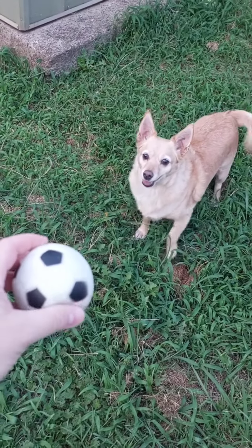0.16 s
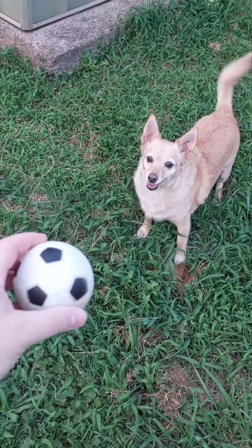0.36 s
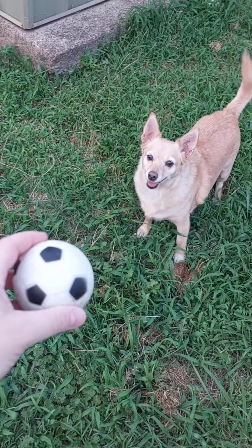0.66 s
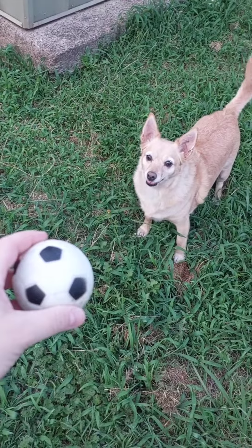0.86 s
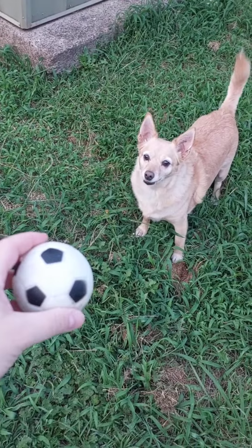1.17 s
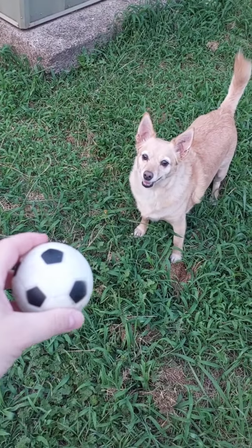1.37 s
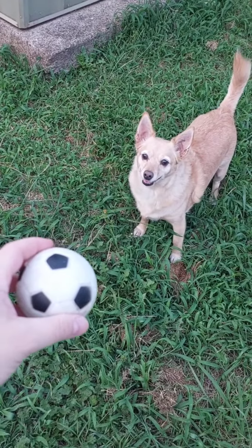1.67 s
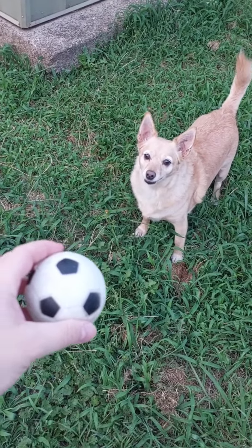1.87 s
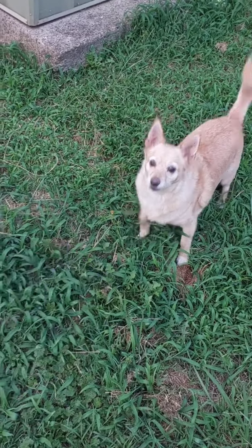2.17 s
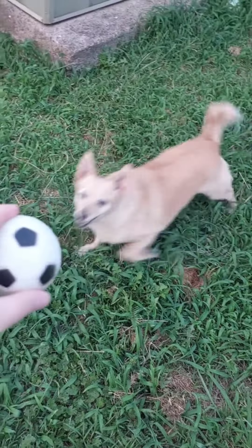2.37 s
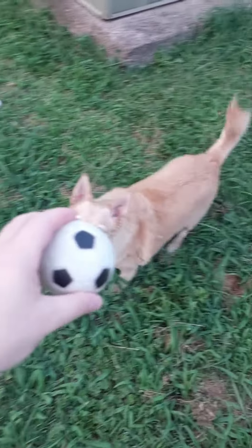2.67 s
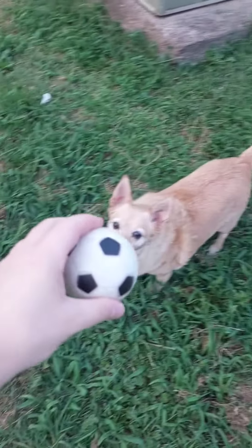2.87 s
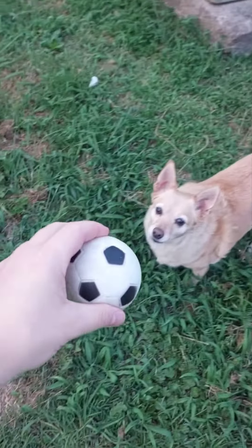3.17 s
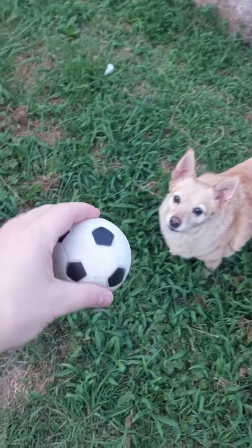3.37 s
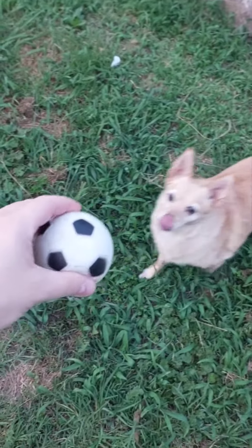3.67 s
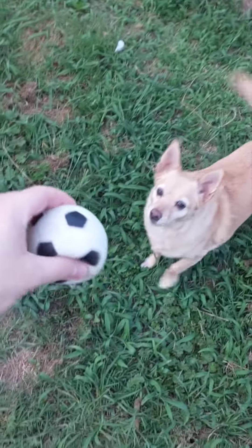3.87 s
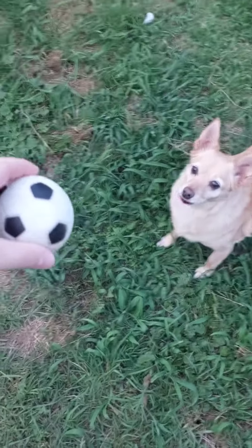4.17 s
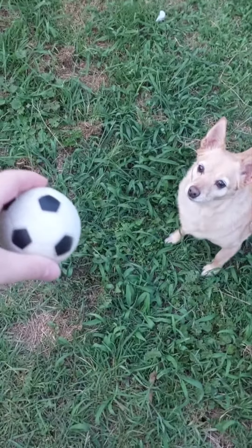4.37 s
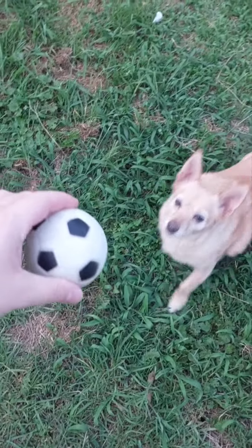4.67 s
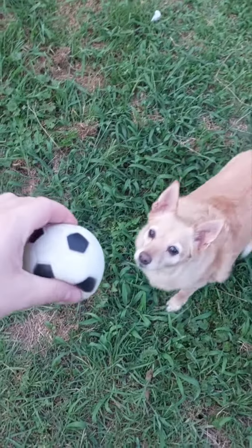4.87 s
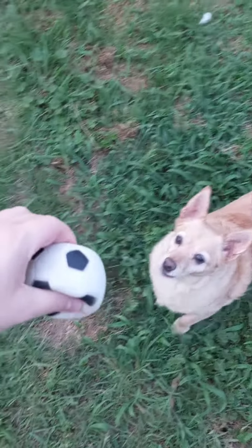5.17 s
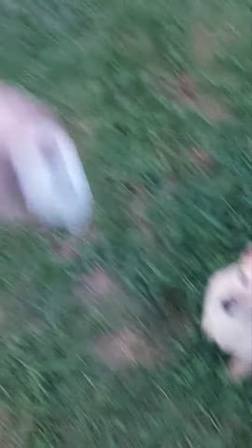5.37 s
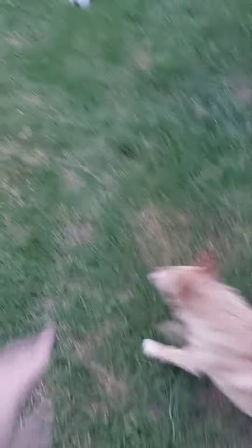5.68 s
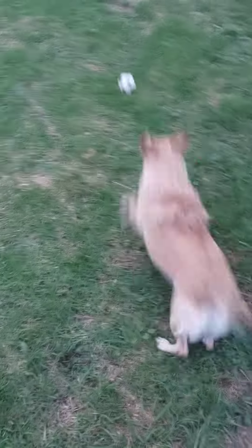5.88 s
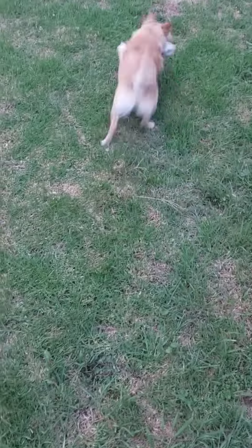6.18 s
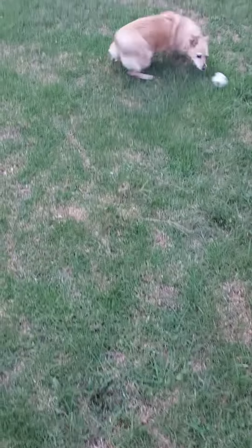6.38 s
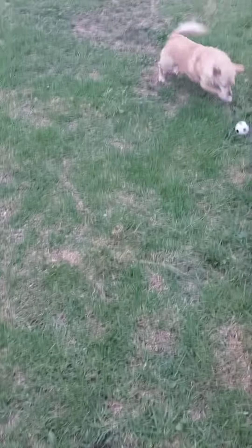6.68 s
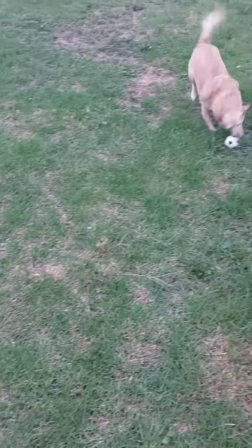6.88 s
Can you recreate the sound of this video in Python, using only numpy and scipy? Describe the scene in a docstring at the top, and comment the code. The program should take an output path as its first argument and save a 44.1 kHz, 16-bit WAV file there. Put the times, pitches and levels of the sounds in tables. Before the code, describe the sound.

High squeaks and wheezy refills from a hand-squeezed toy ball outdoors, with faint hiss and light paw rustles on a lawn.

```python
"""A shrill squeak from a rubber ball squeezed close by on a lawn; later two light and two hard squeezes.
Air forced out drives a plastic reed up and down in pitch; after each hard squeeze the ball refills
through the reed with a falling wheeze. Around it: a faint warbling hiss, far whistles, a low rumble,
and steps and a small dog's paws rustling in the grass."""
import sys
import numpy as np
from scipy import signal
from scipy.fft import rfft, irfft
from scipy.io import wavfile
from scipy.ndimage import uniform_filter1d, minimum_filter1d

SR = 44100
rng = np.random.default_rng(int(sys.argv[2]) if len(sys.argv) > 2 else 0)


def generate_wav(signal):
    """Clip the signal to [-1, 1] and save it as 16-bit WAV at the path in sys.argv[1]."""
    frames = np.transpose(np.atleast_2d(signal))
    scaled = np.clip(frames, -1, 1) * 32767
    pcm = np.round(scaled).astype(np.int16)
    wavfile.write(sys.argv[1], SR, pcm)


N = 310023
TIME_S = np.arange(N) / SR
STALL_HZ, BAND_LIMIT_HZ = 899.4, 15850

# Table levels are relative; each layer applies its own gain.
# background spectra: f/Hz, level/dB
RUMBLE_SPECTRUM = [(13, -44), (22, -13), (43, -2), (65, -2), (167, -13), (274, -13.5), (426, -22),
                   (501, -20.5), (610, -26.5), (1100, -26.5), (1430, -39), (2420, -120)]
HISS_SPECTRUM = [(350, -37.5), (600, -14.5), (1140, -16.5), (1370, -7), (1620, -10), (2800, -0.5),
                 (3300, -6), (3930, -1), (9340, -18), (12000, -19), (15600, -44.5), (22000, -120)]
WARBLE_SPECTRUM = [(1500, -28), (2300, -3), (2800, 2), (3400, -6.5), (4100, -2.5), (5100, 3), (6000, -11),
                   (7500, -15), (10000, -35.5)]
GRASS_SPECTRUM = [(400, -19), (1500, 3), (3000, -10), (7000, 0), (10000, -3), (13000, 5.5), (16000, -2.5)]
# background envelopes: t/s, level/dB
HISS_ENVELOPE = [(.42, -66.5), (.85, -63), (1.15, -64), (1.28, -70), (1.42, -61), (1.8, -55), (2.0, -65.5),
                 (2.2, -57), (3.1, -56), (3.28, -67), (3.5, -60), (4.42, -67), (4.65, -62), (4.9, -60.5),
                 (5.6, -56.5), (6.15, -67), (6.4, -60), (7.0, -61.5)]
WARBLE_ENVELOPE = [(.42, -56.5), (.68, -51), (1.14, -56), (1.27, -61.5), (1.5, -46), (1.75, -57),
                   (2.15, -60.5), (2.38, -44.5), (2.68, -50), (2.95, -50), (3.25, -55), (3.42, -81),
                   (4.36, -53), (4.75, -65), (5.8, -55.5), (6.3, -61.5), (6.62, -57), (7.0, -51.5)]
# step and handling knocks: t/s, peak/dB, f/Hz, time constant/s
KNOCKS = [(1.624, -48, 59, 0.036), (2.352, -36, 65, 0.013), (2.397, -46.5, 567, 0.0066),
          (3.478, -50, 50.7, 0.041), (3.842, -51, 60, 0.046), (5.434, -40, 72.8, 0.02),
          (5.708, -38.5, 1230, 0.00122), (6.095, -43, 2790, 0.0019)]
# far whistles: t/s, length/s, start f/Hz, end f/Hz, level/dB
WHISTLES = [(.76, 0.33, 974, 1120, -75.5), (1.24, 0.28, 1250, 1423, -65.5), (2.181, .16, 1450, 1580, -65.5),
            (3.746, .1, 4920, 4730, -52), (6.571, 0.14, 4010, 3860, -55), (6.803, 0.19, 3940, 4230, -64)]
# feet and paws brushing grass: t/s, peak/dB, rise/s, fall/s
STEPS = [(.87, -67, .012, 0.028), (1.55, -65.5, 0.1, 0.079), (2.47, -57.5, 0.19, .27),
         (3.501, -67, 0.021, 0.12), (4.8, -66.5, 0.026, .09), (5.77, -56, 0.1, 0.065),
         (5.89, -57.5, 0.042, .06), (6.02, -57.5, 0.017, 0.05), (6.11, -58.5, .012, 0.033),
         (6.25, -63.5, 0.047, 0.026), (6.36, -58.5, 0.032, 0.045), (6.55, -62, 0.063, 0.42)]
# blades snapping: t/s, level/dB, decay/s
SNAPS = [(2.421, -34.5, 0.031), (2.548, -32, 0.017), (2.727, -39, 0.0098), (5.879, -34, 0.011),
         (5.954, -38, 0.015), (6.093, -37.5, 0.014), (6.112, -34.5, 0.0065), (6.252, -48.5, 0.0095),
         (6.349, -36.5, 0.0067)]
# hand, body and ground echoes: left delay/s, right delay/s, level/dB
NEAR_ECHOES = [(.00062, 0.0011, -21.5), (.0019, 0.0033, -30), (.0034, .0039, -18), (.0061, 0.0083, -16),
               (.0083, 0.014, -17)]
# ball position: t/s, right minus left/dB
BALL_PAN = [(0, -3.5), (3.7, -1.5), (4.2, 2.5), (4.9, 6.5), (5.7, -5.5)]
# mouthpiece response, air out and air in: f/Hz, left/dB, right/dB
MOUTHPIECE_OUT = [(900, -4, -6.5), (2140, -10, 3), (2500.0, -3, -22.5), (3250, -0.5, 4), (4480, 2, 2.5),
                  (5360, 4, 5), (6340, 0.5, 4), (6830, -5.5, 13.5), (7640, 13.5, 20.5), (8420, -2.5, 14),
                  (9670, -9, 1), (11300, -7, 3), (12300, -10, 2), (14500.0, -21, 3.5)]
MOUTHPIECE_IN = [(1040, -4, -4.0), (2162, -9.5, 8.5), (2210, 12.5, -3.5), (3330, 1.5, 11), (3900, 4.5, 5.5),
                 (4870, 9, 7), (6260, -11.5, 1.5), (6930, -4.5, -2.5), (7630, 5, 28.5), (7280, 24.5, 26),
                 (8670, -1.5, 17.5), (9600.0, 8, 17.5), (11700, 0, 19), (12850, 12.5, 15.5),
                 (14300, -21, 13)]
# reed registers: f/Hz, level/dB, brightness/(dB/oct), roughness/1
REGISTERS = [(880, -43, -3, 0.3), (1054, -30, 6, .48), (1280, -21.5, 0.5, .5), (1790, -26, 4.5, 1),
             (2010, -18, -3, 1), (2600, -17.5, -6.5, 0.7), (3050, -24.5, 1, 0.4), (4000, -29.5, -5.5, 0.6)]
# reed pitch following hand pressure, one curve per hard squeeze: t/s, f/Hz
SQUEEZE_PITCH = [
    [(0, 2003), (.006, 1969), (.009, 2587), (.019, 2797), (.032, 3760), (.042, 3780), (.054, 3643),
     (.062, 2804), (.071, 2388), (.076, 1870), (.087, 1207), (.104, 903)],
    [(3.825, 988), (3.842, 1109), (3.856, 1323), (3.878, 1730), (3.888, 2114), (3.892, 2544), (3.905, 2876),
     (3.916, 3575), (3.926, 3684), (3.937, 2690), (3.944, 2444), (3.949, 1783), (3.962, 1108), (3.973, 874)],
    [(5.169, 968), (5.19, 1125), (5.205, 1220), (5.222, 1447), (5.254, 1904), (5.268, 1923), (5.285, 1877),
     (5.294, 1693), (5.312, 1303), (5.33, 1078), (5.348, 920)],
]
# hard squeezes: strength/dB, easing/(dB/s), added brightness/(dB/oct), added roughness/1
HARD_SQUEEZES = [(3, 43, -2, .05), (1, 26, 0.5, -.05), (-1.33, 6, -1.7, 0.087)]
# light squeezes: start/s, top/s, end/s, top f/Hz, level/dB, brightness/(dB/oct)
LIGHT_SQUEEZES = [(3.558, 3.584, 3.638, 1029, -28, 4), (4.968, 4.999, 5.046, 1070, -31.5, 5)]
# refills: start/s, top/s, end/s, top f/Hz, bend/1, level/dB, fade/dB, top and stall brightness/(dB/oct)
REFILLS = [(.145, 0.157, .32, 1064, 1.05, -30.5, 10.5, 4, 8.8),
           (3.993, 4.009, 4.161, 1091, 1.3, -30, 8.5, 3.5, 3),
           (5.377, 5.418, 5.708, 1113, 1.61, -29.5, 20.1, 9.5, 9.4)]


def amp(db):
    """Decibels to gain."""
    return 10 ** (np.asarray(db) / 20)


def unit(x):
    """Scale to rms 1."""
    return x / np.sqrt(np.mean(x ** 2) + 1e-20)


def at_time(points, t):
    """Interpolate over time."""
    return np.interp(t, *np.transpose(points))


def at_hz(points, hz):
    """Interpolate over log frequency."""
    f, value = np.transpose(points)
    return np.interp(np.log(hz + 1), np.log(f + 1), value)


def add(mix, start_s, sound):
    """Mix in a sound at start_s."""
    part = mix[:, max(round(start_s * SR), 0):][:, :sound.shape[-1]]
    part += sound[..., :part.shape[1]]


def colour(x, spectrum):
    """Minimum-phase filter; rows: f/Hz, gain/dB."""
    log_gain = np.log(amp(at_hz(spectrum, abs(np.fft.fftfreq(2048, 1 / SR)))))
    taps = np.fft.ifft(np.exp(np.conj(signal.hilbert(log_gain)))).real
    return signal.oaconvolve(x, taps[:1024])[:len(x)]


def wander(cutoff_hz, size):
    """Low-passed random motion, rms 1."""
    f = np.fft.rfftfreq(size, 1 / SR)
    return unit(irfft(rfft(rng.standard_normal(size)) / (1 + (f / cutoff_hz) ** 4), size))


def stereo_noise(spectrum, correlation):
    """Coloured noise pair, rms 1."""
    left, other = rng.standard_normal((2, N))
    right = correlation * left + np.sqrt(1 - correlation ** 2) * other
    return unit(np.array([colour(v, spectrum) for v in (left, right)]))


def pan(right_db):
    """Left and right gains."""
    return amp(np.array([[-.5], [.5]]) * right_db)


def rumble(gain_db=-55, follow=.8):
    """Outdoor rumble partly following the hiss level, plus soft knocks of steps and handling."""
    low_cut = signal.butter(3, 34, "high", fs=SR)
    envelope = unit(amp(at_time(HISS_ENVELOPE, TIME_S)) ** follow)
    out = signal.lfilter(*low_cut, stereo_noise(RUMBLE_SPECTRUM, .7)) * envelope * amp(gain_db)
    for start_s, db, hz, tau_s in KNOCKS:
        t = np.arange(0, 8 * tau_s, 1 / SR)
        cycles = np.cumsum(hz * (1 + .42 * wander(hz / 2, len(t)))) / SR
        add(out, start_s, amp(db) * t / tau_s * np.exp(1 - t / tau_s) * np.sin(2 * np.pi * cycles))
    return out * pan(3.2)


def hiss(noise_db=4, warble_db=-4, bend=.1, blur=.02, spread_db=2, count=3200):
    """Outdoor hiss, warbling with many short, blurred, gliding tones."""
    warble = np.zeros((2, N))
    wobble = blur * wander(180, N)
    draws = zip(rng.random((count, 4)), rng.standard_normal((count, 2)))
    for (when, height, span, side), (slide, size) in draws:
        u = np.linspace(0, 1, int((.029 + .06 * span) * SR))
        drift = wobble[int(side * (N - len(u))):][:len(u)]
        hz = (2200 + 4800 * height) * (1 + bend * slide * u + drift)
        tone = np.sin(2 * np.pi * np.cumsum(hz) / SR) * np.sin(np.pi * u)
        add(warble, when * N / SR, amp(spread_db * min(size, 1.8)) * pan(24 * (side - .5)) * tone)
    warble = unit(np.array([colour(v, WARBLE_SPECTRUM) for v in warble]))
    warble *= amp(warble_db + at_time(WARBLE_ENVELOPE, TIME_S))
    return warble + amp(noise_db + at_time(HISS_ENVELOPE, TIME_S)) * stereo_noise(HISS_SPECTRUM, 0)


def whistles(waver=.008):
    """Thin far tones that swell, slide to a plateau and fade."""
    out = np.zeros((2, N))
    for start_s, length_s, start_hz, end_hz, db in WHISTLES:
        u = np.linspace(0, 1, int(length_s * SR))
        hz = start_hz + (end_hz - start_hz) * np.sin(np.pi * u / 2)
        hz *= 1 + waver * wander(90, len(u))
        tone = np.sqrt(2) * np.sin(2 * np.pi * np.cumsum(hz) / SR)
        add(out, start_s, amp(db) * np.sin(np.pi * u) * tone)
    return out


def crackle(size, grains_per_s=2500, spread_db=4):
    """Crushed blades: tiny clicks over noise, rms 1."""
    clicks = rng.standard_normal((2, size)) * (rng.random((2, size)) < grains_per_s / SR)
    clicks *= amp(spread_db * np.minimum(rng.exponential(1, (2, size)), 4))
    grains = unit(clicks) + .6 * rng.standard_normal((2, size))
    return unit(np.array([colour(v, GRASS_SPECTRUM) for v in grains]))


def grass(rustle_db=5, snap_db=-9, still_db=-80):
    """Feet and paws brush the grass in swells and snap blades."""
    brushing = np.full(N, amp(still_db))
    for peak_s, db, rise_s, fall_s in STEPS:
        width_s = np.where(TIME_S < peak_s, rise_s, fall_s)
        brushing += amp(db) * np.exp(-((TIME_S - peak_s) / width_s) ** 2)
    out = crackle(N) * brushing * amp(rustle_db)
    t = np.arange(SR // 10) / SR
    for start_s, db, decay_s in SNAPS:
        add(out, start_s, amp(db + snap_db) * np.exp(-t / decay_s) * crackle(len(t)))
    return out * pan(1.9)


def yard_echoes(x, gain_db=-25, t60_s=.25, first_s=.0036, echoes_per_s=2000):
    """Weak scatter from the ground and the house wall."""
    t = np.arange(SR // 2) / SR
    taps = rng.standard_normal((2, len(t))) * (rng.random((2, len(t))) < echoes_per_s / SR)
    taps *= (t > first_s) * amp(-60 * t / t60_s)
    taps /= np.linalg.norm(taps, axis=1, keepdims=True)
    sent = colour(x.mean(0), [(900, 6.5), (2500, 12), (5000, 10.5), (8000, 7), (14000, -5)])
    return amp(gain_db) * signal.fftconvolve(sent[None], taps, axes=1)[:, :N]


def near_echoes(x):
    """Short echoes comb the direct sound: gliding overtones swell and dip."""
    out = np.zeros((2, N))
    for left_s, right_s, db in NEAR_ECHOES:
        for ear, delay_s in enumerate((left_s, right_s)):
            add(out[ear:ear + 1], delay_s, amp(db) * x[ear])
    return out


def intakes(gain_db=-52, rise_s=.012, fade_s=.16):
    """After a light squeeze, air rushes back too gently to sound the reed."""
    out = np.zeros((2, N))
    t = np.arange(SR // 5) / SR
    envelope = amp(gain_db) * (1 - np.exp(-t / rise_s)) * np.exp(-t / fade_s)
    spectrum = [(400, -40), (1200, -1), (2600, -18.5), (5000, -3.5), (9000, 4), (13000, 3), (16000, 5.5)]
    for _, _, end_s, *_ in LIGHT_SQUEEZES:
        rush = unit(colour(rng.standard_normal(len(t)), spectrum))
        add(out, end_s, envelope * rush * pan(at_time(BALL_PAN, end_s) + 5))
    return out


def edges_db(t, release_s, release_db, onset_db=5, onset_s=.0014):
    """The reed's swing builds at the start of a stroke and drops at its end."""
    release = np.maximum(1 - (t[-1] - t) / release_s, 0)
    return -onset_db * np.exp(-(t - t[0]) / onset_s) - release_db * release


def refill(start_s, top_s, end_s, top_hz, bend, db, fade_db, top_bright, stall_bright,
           scoop_hz_per_s2=30000, build_db_per_s=70, knee_s=.01248):
    """Stroke: the rubber springs back; pitch and level sink as suction runs out."""
    t = np.linspace(start_s, end_s, 200)
    early_s = np.maximum(top_s - t, 0)
    spent_s = np.hypot(np.maximum(t - top_s, 0), knee_s) - knee_s
    suction = (1 - spent_s / spent_s[-1]) ** bend
    hz = STALL_HZ + (top_hz - STALL_HZ) * suction - scoop_hz_per_s2 * early_s ** 2
    level_db = db - fade_db * (1 - suction) ** 1.38 - build_db_per_s * early_s
    level_db += edges_db(t, release_s=.016, release_db=14)
    bright = stall_bright + (top_bright - stall_bright) * suction
    rough = .3 + .34 * (1 - suction)
    return t, hz, level_db, bright, rough


def light_squeeze(start_s, top_s, end_s, top_hz, db, bright, arch=2.1, swell_db=4):
    """Stroke: one low, clean arch, weaker and rougher near the stall."""
    t = np.linspace(start_s, end_s, 200)
    slack = abs((t - top_s) / (end_s - top_s)) ** arch
    hz = top_hz - (top_hz - STALL_HZ) * slack
    level_db = db - swell_db * np.sqrt(slack) + edges_db(t, release_s=.011, release_db=13)
    rough = .068 + .6 * slack
    return t, hz, level_db, np.full_like(t, bright), rough


def hard_squeeze(pitch_curve, strength_db, easing_db_per_s, brighter, rougher):
    """Stroke: the reed is overblown; its register sets level, brightness and roughness."""
    t = np.linspace(pitch_curve[0][0], pitch_curve[-1][0], 200)
    hz = at_time(pitch_curve, t)
    level_db, bright, rough = (at_hz(np.array(REGISTERS)[:, [0, k]], hz) for k in (1, 2, 3))
    flutter_db = unit(uniform_filter1d(rng.standard_normal(len(t)), 6))
    level_db += strength_db - easing_db_per_s * (t - t[0]) + flutter_db
    return t, hz, level_db, bright + brighter, rough + rougher


def reed(stroke, mouthpiece, jitter_cycles, air_db, slope_db_per_oct, waver, gain_db, top_cut_db=0):
    """A plastic reed chops the air; buzz and turbulence ring the mouthpiece. Returns start/s, sound."""
    stroke_s, *curves = stroke
    start_s, end_s = stroke_s[0], stroke_s[-1]
    t = np.arange(start_s, end_s + .05, 1 / SR)
    hz, level_db, bright_db_per_oct, rough = (np.interp(t, stroke_s, c) for c in curves)
    rough = np.clip(rough, 0, 1)
    cycles = np.cumsum(hz * (1 + waver * wander(70, len(t)))) / SR
    # just under the upper register only every fourth beat is alike
    stumble = np.exp(-((hz - 1930) / 130) ** 4)
    cycles += .056 * stumble * (np.sin(np.pi * cycles / 2) + .73 * np.sin(np.pi * cycles))
    cycles += jitter_cycles * rough * (1 - .43 * stumble) * wander(660, len(t))
    buzz = np.zeros(len(t))
    for k in range(1, 18):
        treble_oct = np.clip(np.log2(k * hz / 3500), 0, 1)
        rolloff_db = slope_db_per_oct * np.log2(k) + top_cut_db * max(k - 11.5, 0)
        gain = amp(bright_db_per_oct * treble_oct - rolloff_db) * (k * hz < BAND_LIMIT_HZ + 1000)
        buzz += np.sqrt(2) * gain * np.sin(2 * np.pi * k * cycles)
    buzz *= np.clip((end_s - t) / .0013 + 1, 0, 1)
    # turbulence escapes at each opening
    air_spectrum = [(400, -28), (1500, -10), (4000, 0), (8000, .5), (11000, -1), (16000, -1)]
    air = colour(rng.standard_normal(len(t)), air_spectrum)
    air *= amp(air_db) * rough * (1 - .2 * stumble) * (1 + 1.2 * np.cos(2 * np.pi * cycles))
    air *= np.exp(-np.maximum(t - end_s, 0) / .011)
    attack = 1 - np.exp(-((t - start_s) / .00068) ** 2)
    source = (buzz + air) * attack * amp(level_db + gain_db)
    heard = np.array([colour(source, np.array(mouthpiece)[:, [0, ear]]) for ear in (1, 2)])
    return start_s, heard * pan(at_time(BALL_PAN, t))


def ball():
    """Squeezing blows the reed hard and rough; refilling draws it gently and more cleanly."""
    out = np.zeros((2, N))
    blown = dict(mouthpiece=MOUTHPIECE_OUT, jitter_cycles=.009, air_db=-9.5, slope_db_per_oct=5)
    drawn = dict(mouthpiece=MOUTHPIECE_IN, jitter_cycles=.004, air_db=-20, slope_db_per_oct=8)
    for curve, row in zip(SQUEEZE_PITCH, HARD_SQUEEZES):
        add(out, *reed(hard_squeeze(curve, *row), **blown, waver=.0012, gain_db=1.8))
    for row in LIGHT_SQUEEZES:
        add(out, *reed(light_squeeze(*row), **blown, waver=.0015, gain_db=.93, top_cut_db=.9))
    for row in REFILLS:
        add(out, *reed(refill(*row), **drawn, waver=.0029, gain_db=-1.15, top_cut_db=.5))
    return out


def scene():
    """The ball close by, the yard around it."""
    squeaks = ball()
    toy = squeaks + near_echoes(squeaks) + yard_echoes(squeaks) + intakes()
    return toy + hiss() + whistles() + rumble() + grass()


def record(dry, ceiling=.88):
    """Fast peak limiter, then low-pass."""
    needed_gain = np.minimum(1, ceiling / (abs(dry).max(0) + 1e-9))
    gain = uniform_filter1d(minimum_filter1d(needed_gain, size=129), size=129)
    low_pass = signal.firwin(511, BAND_LIMIT_HZ, window=("kaiser", 9), fs=SR)
    return signal.oaconvolve(dry * gain, low_pass[None], "same")


dry = scene()
out = record(dry)
generate_wav(out)
```